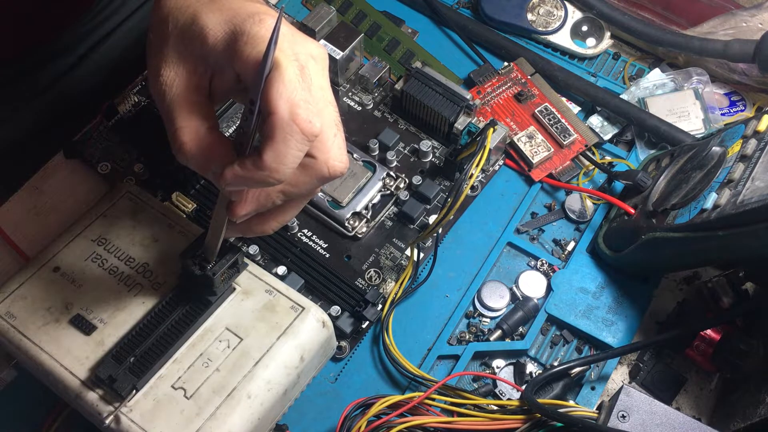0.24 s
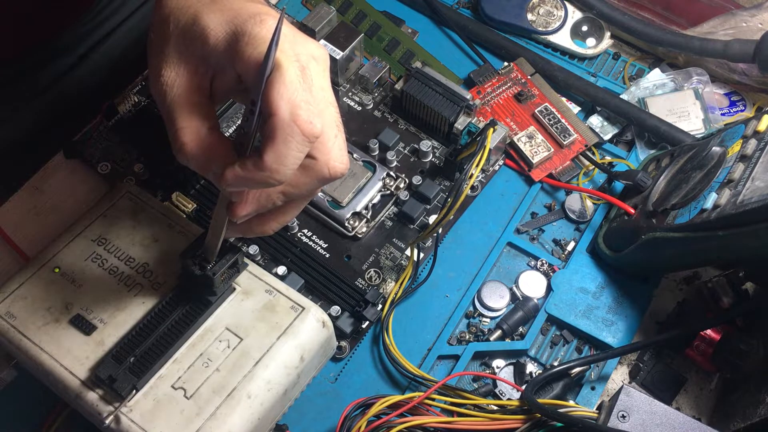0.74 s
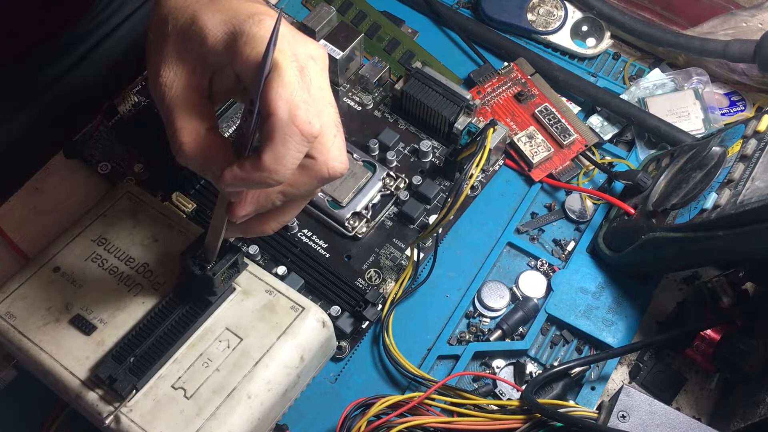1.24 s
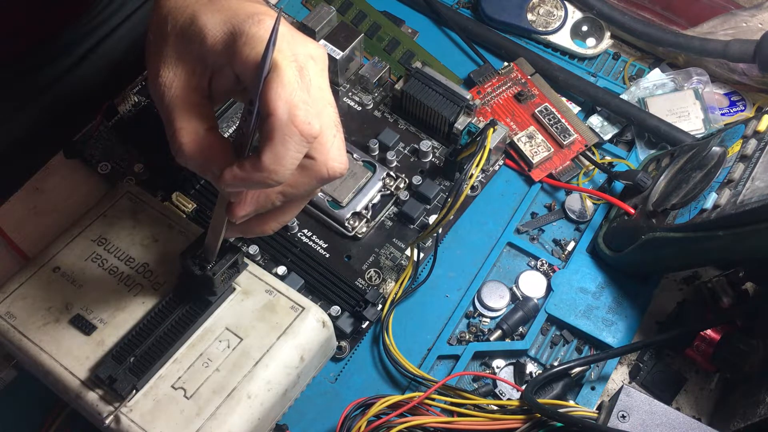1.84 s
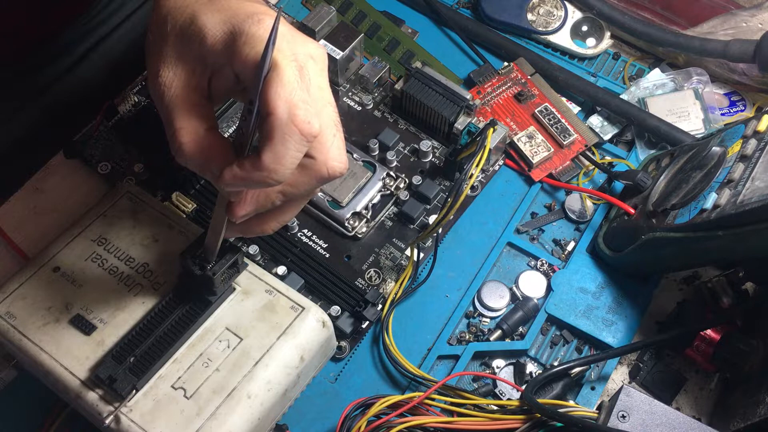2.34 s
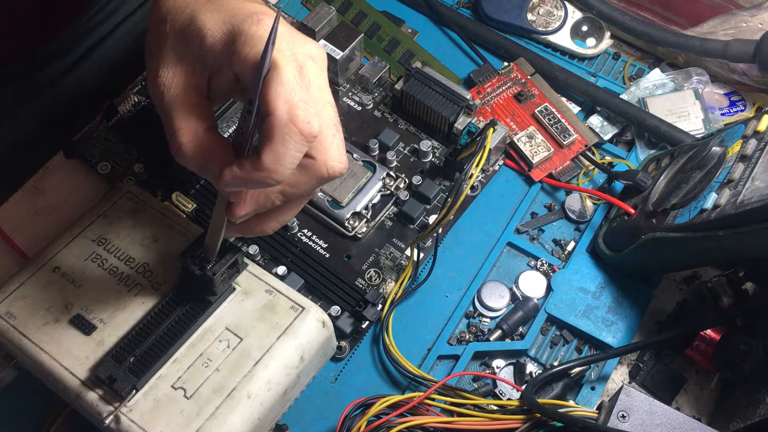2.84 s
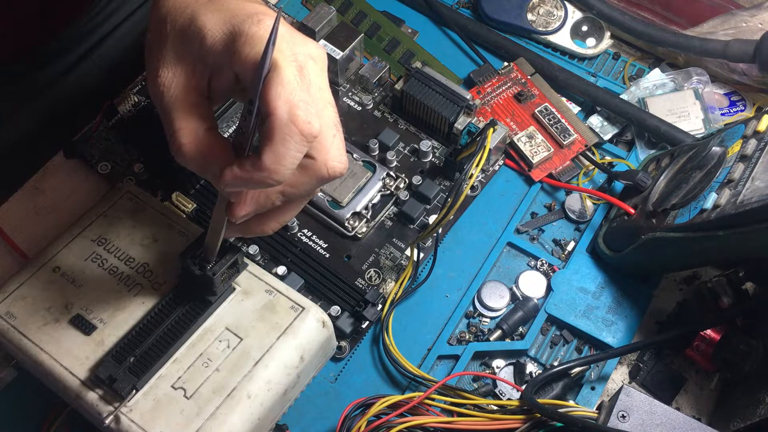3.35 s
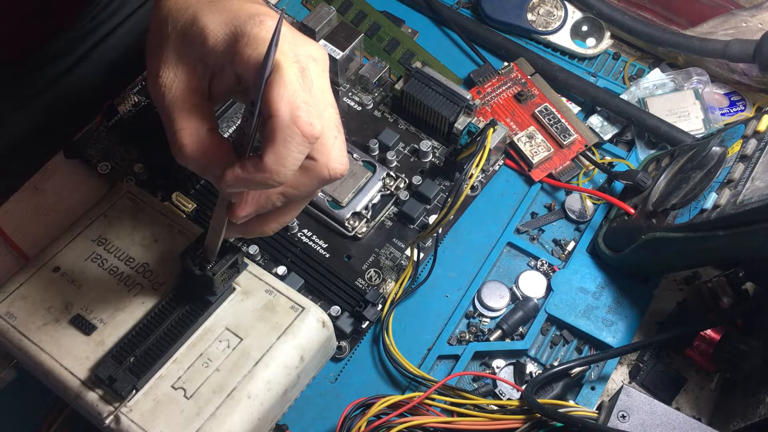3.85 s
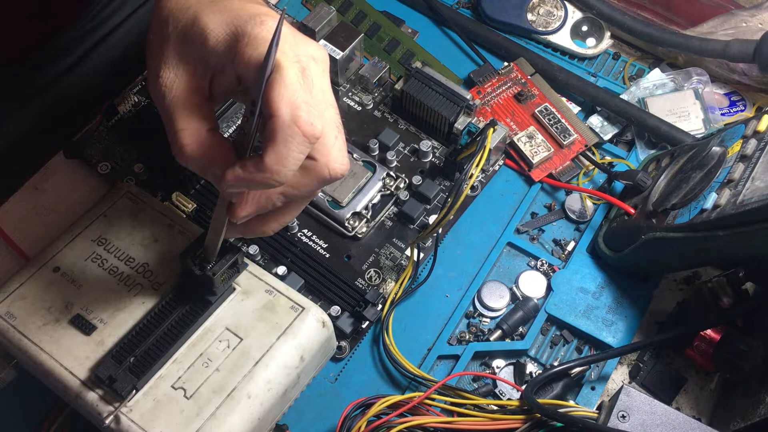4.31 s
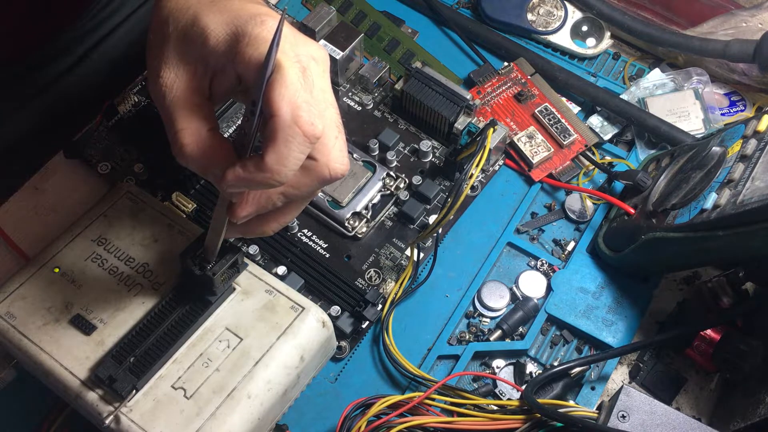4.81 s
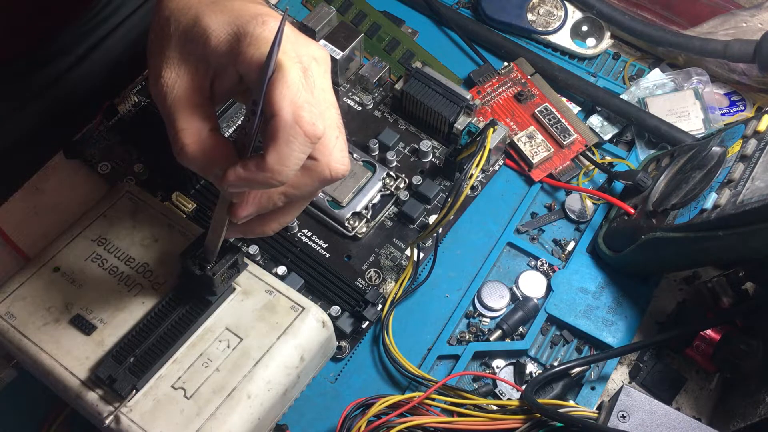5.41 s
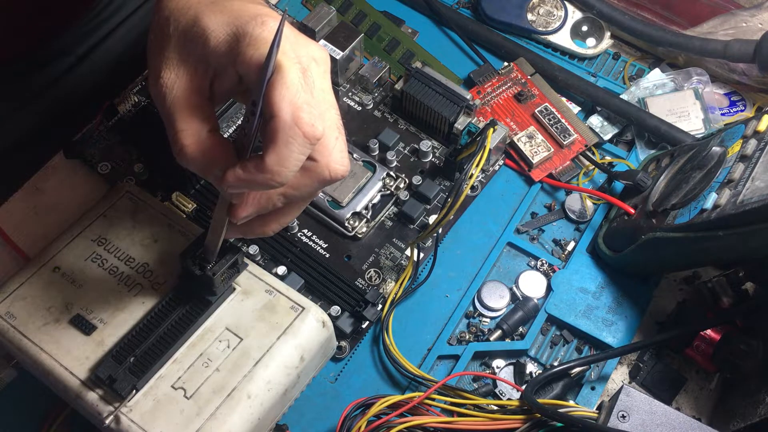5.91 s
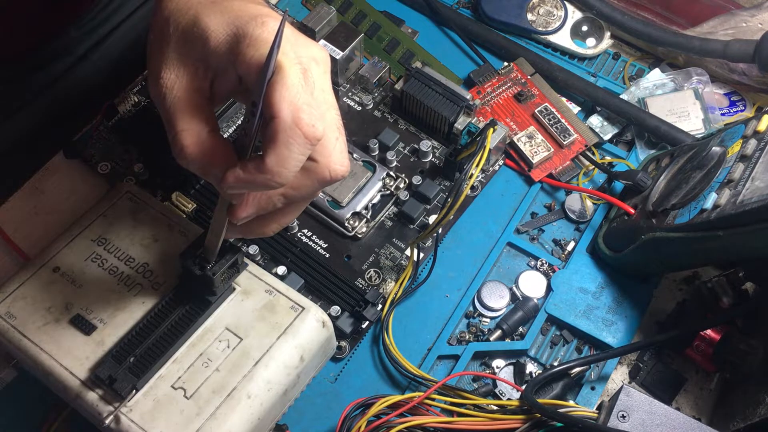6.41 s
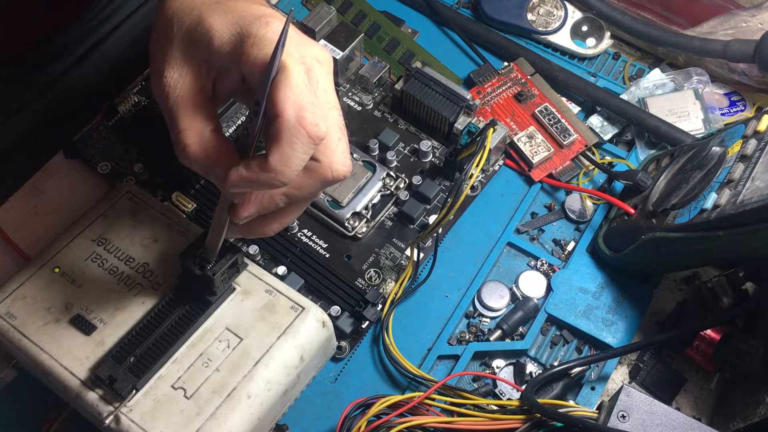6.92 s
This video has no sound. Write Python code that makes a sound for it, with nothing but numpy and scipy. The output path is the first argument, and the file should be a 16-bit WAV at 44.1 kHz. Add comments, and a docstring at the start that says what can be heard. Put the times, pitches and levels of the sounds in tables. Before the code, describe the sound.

A single-cylinder motorbike drones in the street, swelling and fading over a rush of traffic, heard from a repair bench in a small open shop. A brake squeaks faintly early on. Midway, wheels thump over a road joint while a tool scrapes briefly on a circuit board close to the microphone. Near the end a second motorbike passes with singing tyres and a deeper engine hum.

```python
"""A repair bench in a small shop that is open to the street. A single-cylinder motorbike drones away and
a second one comes by later. Each is a stack of tones at multiples of its firing rate, swelling and fading
as echoes add and cancel. Traffic rushes, tyres sing, a deeper engine hums and a brake squeals faintly.
Wheels thump over a road joint; close by, a tool scrapes the board and something rustles."""
import sys
import numpy as np
from scipy import signal
from scipy.fft import rfft, irfft, next_fast_len
from scipy.io import wavfile
from scipy.ndimage import uniform_filter1d

SR = 44100
rng = np.random.default_rng(int(sys.argv[2]) if len(sys.argv) > 2 else 0)


def digitize_waveform(pressure):
    """Quantize a signal to 16-bit integers and store it at the path in sys.argv[1].

    Rows of a 2-D input are taken as channels; values are limited to [-1, 1].
    """
    field = np.atleast_2d(pressure).T
    bounded = np.clip(field, -1, 1)
    quanta = np.round(bounded * 32767).astype(np.int16)
    wavfile.write(sys.argv[1], SR, quanta)


N = 315860

# The tone colour of the street noise. Each row: frequency in Hz, level in dB per Hz.
STREET_COLOUR = [(27, -77), (42, -59.5), (60, -65), (95, -67.5), (165, -57.5), (260, -70.5), (400, -69),
                 (700, -74.5), (1500, -75.5), (2500, -83), (4300, -94.5), (5600, -98.5), (9000, -106),
                 (11500, -113.5), (15500, -125)]
# The centres in Hz of six zones of that noise: the deep rumble, then five higher ones.
ZONE_HZ = [60, 600, 1400, 2700, 6000, 12000]
# The rumble rises and falls. Each row: time in seconds, lift in dB.
RUMBLE_LIFT = [(0, 2), (1.2, 5), (1.9, -1), (2.5, 0.5), (3.6, -4), (4.4, 0), (5.3, -6), (5.7, 1.5),
               (7.16, 2.5)]
# The lift in dB of each of the five higher zones when nothing passes.
QUIET_DB = [-7.5, -12.5, -18.5, -12.5, -15]
# Traffic passing the door. Each row: time when nearest in seconds, seconds until its power has halved,
# then its level in dB in each of the five higher zones.
PASSES = [(.45, 0.54, 2, 3, 0, 2.5, 3), (1.2, 0.29, -2.5, -5.5, -1.5, -2.5, 2.5),
          (6.151, 0.45, 2.5, 5.5, 5, 5, 4), (7.0, 0.33, -0.5, -1, -4, -4, -6)]
# The second bike's tyres passing the door. Each row: time in seconds, level in dB.
TYRE_LEVEL = [(5.6, -66), (5.9, -61), (6.15, -54), (6.35, -47.5), (6.6, -47.5), (6.8, -52), (7.0, -58),
              (7.16, -60)]
# The ringing of their grooves. Each row: pitch in Hz, width in Hz, relative level in dB.
TREAD_RINGS = [(1463, 140, -3.5), (2213, 210, -5), (2480, 280, 1), (3280, 200, -12), (3780, 180, -20),
               (8800, 1600, -24)]
# The ringing of the air in the shop. Each row: pitch in Hz, width in Hz, lift in dB.
SHOP_RINGS = [(570, 73, 2.5), (813, 28, 1.5), (1019, 22, 3), (1200, 57, 1.5)]
# Dips cut by the echo off the bench top. Each row: frequency in Hz, width in Hz, depth in dB.
BENCH_DIPS = [(1806, 490, 3.5), (4890, 310, 6), (7660, 2000, 4.5), (10400, 800, 6)]
# A dry rustle near the bench. Each row: time in seconds, level in dB.
RUSTLE_LEVEL = [(3.15, -92), (3.3, -84), (3.45, -79), (3.62, -78), (3.75, -82), (3.9, -92)]
# Brake squeaks. Each row: start and length in seconds, first and last pitch in Hz, level in dB.
SQUEAKS = [(.065, .025, 4230, 4260, -63), (.13, .025, 4230, 4270, -61), (.445, .01, 4560, 4600, -67),
           (.548, .02, 4600, 4350, -59), (.58, .44, 4160, 4150, -68), (.6, .02, 4150, 4150, -63),
           (.665, .012, 4150, 4150, -67), (.79, .022, 4150, 4150, -59), (.9, .05, 4170, 4140, -63),
           (1.72, .14, 4125, 4125, -72)]
# Tool slips. Each row: start in seconds, level in dB, length in seconds, bass cut-off in Hz.
TOOL_SLIPS = [(2.878, -52, 0.04, 1200), (4.5, -68, .02, 5000), (4.654, -52, 0.025, 1500),
              (5.216, -58, .03, 4500), (5.58, -64, .02, 4000)]
# Road thumps. Each row: start in seconds, strength in dB, pitch in Hz, seconds to fade by 60 dB.
BUMPS = [(2.953, -15.5, 60, 0.2), (3.177, -18, 60.4, 0.18), (4.461, -20, 73, 0.18),
         (5.164, -23, 57.3, 0.26), (6.497, -36, 52.8, 0.21)]
# A deeper engine down the street. Each row: time in seconds, pitch in Hz, level in dB.
FAR_ENGINE = [(5.5, 61.5, -54), (5.8, 63.2, -47), (6.2, 63.4, -42), (6.5, 59.8, -43.5), (6.8, 58, -45),
              (7.16, 57.7, -43)]
# How fast each bike fires. Each row: time in seconds, firings per second.
FIRST_RATE = [(0, 29.6), (.8, 29.45), (1.2, 29.2), (2, 29.15), (3.0, 29.2), (3.3, 29.7), (4.1, 30.4),
              (4.5, 30.6), (4.9, 31), (5.3, 31.3)]
SECOND_RATE = [(5.2, 39.4), (5.9, 39.6), (6.25, 39), (6.45, 38.95), (6.75, 38.4), (7.16, 37.5)]
# Each bike's strong tones, listed by multiple of the firing rate. Each row: time in seconds, level in dB.
FIRST_STRONG = {4: [(0, -34), (.14, -39), (.28, -41), (.55, -34.5), (.8, -28), (1.1, -36.5), (1.45, -38),
                (1.72, -52), (2.06, -35), (2.4, -36), (2.62, -33.5), (3.0, -38.5), (3.5, -39.5),
                (3.64, -44.5), (3.8, -41.5), (4.3, -47), (5.2, -44.5)], 5: [(0, -22.5), (.2, -32),
                (.4, -55), (.6, -38), (.79, -48), (.92, -35), (1.3, -28), (1.56, -36.5), (1.7, -33),
                (1.93, -41), (2.25, -36), (2.95, -37), (3.45, -44), (4.1, -46), (4.5, -44), (4.68, -41.5),
                (4.8, -50), (5.0, -39), (5.3, -48)], 6: [(0, -27), (.12, -29.5), (.27, -62), (.55, -26.5),
                (1.04, -31), (1.2, -37), (1.45, -34), (1.75, -27), (2.1, -27.5), (2.35, -35), (2.47, -32.5),
                (2.85, -41.5), (3.2, -36), (3.55, -35.5), (3.64, -44), (3.8, -36), (4.29, -38.5),
                (4.42, -53), (4.55, -41), (4.68, -59), (4.81, -36.5), (5.05, -55)], 7: [(0, -56),
                (.55, -33), (.85, -40.5), (1.15, -41), (1.43, -51), (1.7, -43), (2.1, -45.5), (2.35, -53),
                (2.5, -45), (3.2, -57), (3.8, -47.5), (5.2, -54)], 13: [(0, -38), (.2, -47.5), (.45, -40),
                (.62, -53), (.95, -37.5), (1.2, -46), (1.45, -42.5), (2.0, -55.5), (2.35, -41.5),
                (2.9, -50.5), (3.9, -59.5), (4.7, -53), (5.2, -52)], 14: [(0, -40.5), (.2, -60),
                (.62, -37.5), (.9, -38), (1.15, -48), (1.35, -44), (1.7, -52), (2.5, -50), (3.0, -55.5),
                (5.2, -61)]}
SECOND_STRONG = {4: [(5.2, -43), (5.34, -50), (5.5, -36.5), (5.62, -35.5), (5.74, -30.5), (5.98, -61),
                 (6.4, -47), (6.52, -41), (6.64, -64), (6.85, -34), (7.03, -42), (7.16, -33)],
                 5: [(5.3, -61), (5.47, -43), (5.6, -65), (6.14, -63), (6.27, -35), (6.51, -33.5),
                 (6.66, -44), (6.88, -34.5), (7.16, -46.5)], 6: [(5.2, -50), (5.9, -53), (6.1, -60),
                 (6.35, -40.5), (6.8, -50), (7.16, -48)], 9: [(5.2, -47.5), (5.5, -43.5), (5.85, -45.5),
                 (6.1, -66), (6.4, -46), (7.16, -64)], 10: [(5.2, -55), (5.6, -51.5), (5.95, -42.5),
                 (6.15, -53), (6.4, -40.5), (6.7, -50), (7.16, -61)]}
# The level that a bike's weak tones share. Each row: time in seconds, level in dB.
FIRST_WEAK_LEVEL = [(0, -51), (.45, -43), (.9, -46), (1.3, -45.5), (1.6, -49.5), (2.4, -49.5), (3.0, -53.5),
                    (3.6, -50.5), (4.4, -51), (5.3, -53)]
SECOND_WEAK_LEVEL = [(5.2, -53), (5.6, -48), (6.1, -45.5), (6.42, -41.5), (6.7, -39), (6.9, -55),
                     (7.16, -54)]
# The weak tones. Each row: multiple of the firing rate, dB added to the shared level.
FIRST_WEAK = [(2, 2), (3, -4.5), (8, -2.5), (9, -4.5), (10, -3), (11, 2), (12, -1.5), (16, -10.5),
              (19, -10.5)]
SECOND_WEAK = [(1, 0.5), (2, -2), (3, -0.5), (7, -5.5), (8, -7.5), (12, -10.5)]


def gain(db):
    """Turns decibels into a number to multiply by."""
    return 10 ** (np.asarray(db) / 20)


def curves(table):
    """Joins timed rows with straight lines: one curve for each column after the time."""
    times, *columns = np.transpose(table)
    return [np.interp(np.arange(N) / SR, times, column) for column in columns]


def fade(table, rise_s, fall_s):
    """Fades in before the first row's time and out after the last."""
    t = np.arange(N) / SR
    return np.clip(1 + (t - table[0][0]) / rise_s, 0, 1) * np.clip(1 - (t - table[-1][0]) / fall_s, 0, 1)


def wander(per_second):
    """A smooth random curve that strays about 1 either side of zero."""
    hop = 64  # samples per step
    hold = max(int(SR / per_second / hop), 1)
    steps = np.repeat(rng.standard_normal(400), hold)[:N // hop + 1]
    smooth = 1.3 * uniform_filter1d(uniform_filter1d(steps, hold), hold)
    return np.interp(np.arange(N) / hop, np.arange(len(smooth)), smooth)


def tone(cycles, db, sway, flicker_db, drift=0):
    """A tone whose level flickers and whose phase sways quickly and drifts slowly, both in radians."""
    level = gain(db + flicker_db * wander(14))
    phase = 2 * np.pi * cycles + sway * wander(7.5) + drift * wander(1.545)
    return -np.sqrt(2) * level * np.cos(phase)


def resonance(x, hz, width_hz):
    """Lets through only the sound near one pitch."""
    return signal.lfilter(*signal.iirpeak(hz, hz / width_hz, SR), x)


def narrow_hiss(hz, width_hz):
    """Noise gathered around one pitch, at a standard level."""
    hiss = resonance(resonance(rng.standard_normal(N), hz, width_hz), hz, width_hz)
    return hiss / hiss.std()


def passing_power(nearest_s, halving_s, db):
    """Something going by in a straight line: its power falls with the distance squared."""
    return gain(2 * db) / (1 + ((np.arange(N) / SR - nearest_s) / halving_s) ** 2)


def traffic_rush(gust_db=1.06, flicker_db=0.86):
    """Bands of noise swell as traffic passes; each flickers alone and the treble ones gust together."""
    lifts_db = curves(RUMBLE_LIFT)
    for zone, quiet_db in enumerate(QUIET_DB):
        traffic = sum(passing_power(at_s, halving_s, db[zone]) for at_s, halving_s, *db in PASSES)
        lifts_db.append(10 * np.log10(gain(2 * quiet_db) + traffic))
    lifts_db = np.array(lifts_db)
    size = next_fast_len(N)
    thirds = 3 * np.log2(np.maximum(np.fft.rfftfreq(size, 1 / SR), 1))  # pitch in thirds of an octave
    hz, colour_db = np.transpose(STREET_COLOUR)
    white = rfft(rng.standard_normal(size)) * np.sqrt(SR / 2)  # a power of 1 per Hz
    coloured = white * gain(np.interp(thirds, 3 * np.log2(hz), colour_db))
    out, gust = 0, wander(7.7)
    for centre in range(13, 44):
        window = np.cos(np.pi / 2 * np.clip(thirds - centre, -1, 1)) ** 2
        band = irfft(coloured * window, size)[:N]
        # how much this band belongs to each zone
        share = np.array([np.interp(centre / 3, np.log2(ZONE_HZ), row) for row in np.eye(len(ZONE_HZ))])
        treble_gust_db = share[-2:].sum() * gust_db * gust
        out = out + band * gain(share @ lifts_db + treble_gust_db + flicker_db * wander(12))
    return out


def tyre_song(flicker_db=1.0):
    """Road noise rings in the grooves of the tread."""
    out = 0
    for hz, width_hz, db in TREAD_RINGS:
        out = out + narrow_hiss(hz, width_hz) * gain(db + flicker_db * wander(9))
    return fade(TYRE_LEVEL, 0.18, 1) * gain(curves(TYRE_LEVEL)[0]) * out


def shop_echo(x, tail_s=.3, echo_db=-12):
    """The walls add a short tail, and the air in the shop rings at a few pitches."""
    t = np.arange(SR // 2) / SR
    echo = rng.standard_normal(len(t)) * gain(-60 * t / tail_s)
    echo *= gain(echo_db) / np.linalg.norm(echo)
    echo[0] = 1  # the direct sound
    padded = np.concatenate([x[len(t) - 1::-1], x])  # so the shop is already full of sound at the start
    x = signal.fftconvolve(padded, echo / np.linalg.norm(echo))[len(t):len(t) + N]
    for hz, width_hz, db in SHOP_RINGS:
        x = x + (gain(db) - 1) * resonance(x, hz, width_hz)
    return x


def rustle(flicker_db=4.0):
    """A thin, high hiss in uneven bursts."""
    hiss = narrow_hiss(hz=9100, width_hz=1100)
    level = gain(curves(RUSTLE_LEVEL)[0] + flicker_db * wander(22))
    return fade(RUSTLE_LEVEL, .05, .05) * level * hiss


def brake_squeal(chatter_hz=200, roughness=.4):
    """A brake pad gives a thin, broken whistle, made rough by its chatter."""
    out = 0
    chatter = signal.sosfilt(signal.butter(2, chatter_hz, fs=SR, output="sos"), rng.standard_normal(N))
    for start_s, length_s, first_hz, last_hz, db in SQUEAKS:
        glide = [(start_s, first_hz), (start_s + length_s, last_hz)]
        cycles = np.cumsum(curves(glide)[0]) / SR
        out = out + fade(glide, .012, .018) * tone(cycles, db, sway=1.3, flicker_db=1.5)
    return out * (1 + roughness * chatter / chatter.std())


def tool_scrapes(treble_cut_hz=3200, rise_s=.004, tail_s=.02):
    """The tool tip slips on the board: a quick, grainy hiss with a short tail."""
    out = np.zeros(N)
    t = np.arange(SR // 4) / SR
    cut_treble = signal.butter(2, treble_cut_hz, fs=SR, output="sos")
    for start_s, db, length_s, bass_cut_hz in TOOL_SLIPS:
        shape = np.minimum(t / rise_s, 1) * np.exp(-t / length_s - np.maximum(t - length_s, 0) / tail_s)
        grit = rng.standard_normal(len(t)) * gain(1.5 * rng.exponential(1, len(t)))
        cut_bass = signal.butter(2, bass_cut_hz, "high", fs=SR, output="sos")
        grit = signal.sosfilt(np.r_[cut_bass, cut_treble], grit)
        out[int(start_s * SR):][:len(t)] += gain(db) * shape * grit / grit.std()
    return out


def road_thumps(rise_s=0.019):
    """Wheels drop over a joint in the road: a short, low ring."""
    out = np.zeros(N)
    t = np.arange(SR // 2) / SR
    for start_s, db, hz, ring_s in BUMPS:
        shape = (1 - np.exp(-t / rise_s)) * gain(-60 * t / ring_s)
        out[int(start_s * SR):][:len(t)] += gain(db) * shape * np.sin(2 * np.pi * hz * t)
    return out


def far_engine():
    """The deeper engine down the street: one low, wavering tone."""
    hz, db = curves(FAR_ENGINE)
    return fade(FAR_ENGINE, 0.34, 1) * tone(np.cumsum(hz) / SR, db, sway=0.97, flicker_db=5.5)


def motorbike(rate, strong, weak, weak_level, dip_db, sway, drift):
    """Tones at multiples of the firing rate. Uneven firing sways them; moving echoes drift and fade them."""
    firings = .4 + np.cumsum(curves(rate)[0]) / SR
    out = 0
    for multiple, levels in strong.items():
        swell = curves([(time_s, gain(db)) for time_s, db in levels])[0]
        flicker_db = 0.65 * np.sqrt(multiple)
        out = out + swell * tone(multiple * firings, 0, sway * multiple, flicker_db, drift)
    for multiple, offset_db in weak:
        db = curves(weak_level)[0] + offset_db + dip_db * np.minimum(wander(6.0), .5)
        out = out + tone(multiple * firings, db, sway * multiple, flicker_db=2.53, drift=drift)
    return out


def scene():
    """Everything adds up in one channel; only the rush and the tyres get the shop's echo."""
    first = motorbike(FIRST_RATE, FIRST_STRONG, FIRST_WEAK, FIRST_WEAK_LEVEL,
                      dip_db=5.0, sway=.09, drift=.6)
    second = motorbike(SECOND_RATE, SECOND_STRONG, SECOND_WEAK, SECOND_WEAK_LEVEL,
                       dip_db=4.0, sway=.11, drift=.69)
    engines = fade(FIRST_RATE, 1, 0.39) * first + fade(SECOND_RATE, 0.37, 1) * second + far_engine()
    street = shop_echo(traffic_rush() + tyre_song())
    return (engines + street + brake_squeal() + road_thumps() + tool_scrapes() + rustle())[None]


def record(dry, top_hz=15740):
    """The echo off the bench top cuts dips into everything, and the highest treble is cut off."""
    lead = SR // 20  # a short run-in lets the filters settle
    out = np.pad(dry, ((0, 0), (lead, 0)), "reflect", reflect_type="odd")
    for hz, width_hz, depth_db in BENCH_DIPS:
        out = out - (1 - gain(-depth_db)) * resonance(out, hz, width_hz)
    cut_treble = signal.ellip(10, .2, 80, top_hz, fs=SR, output="sos")
    return signal.sosfilt(cut_treble, out)[:, lead:]


dry = scene()
out = record(dry)
digitize_waveform(out)
```